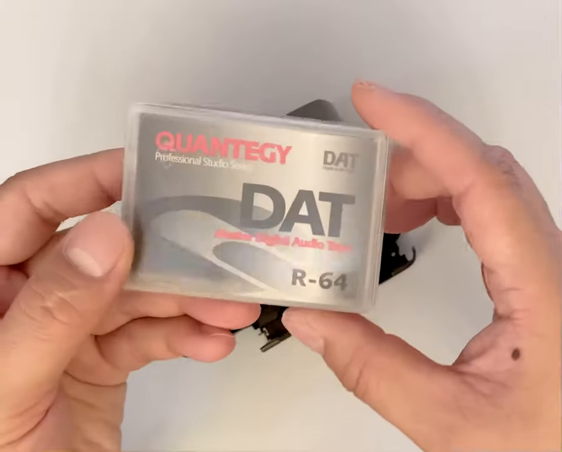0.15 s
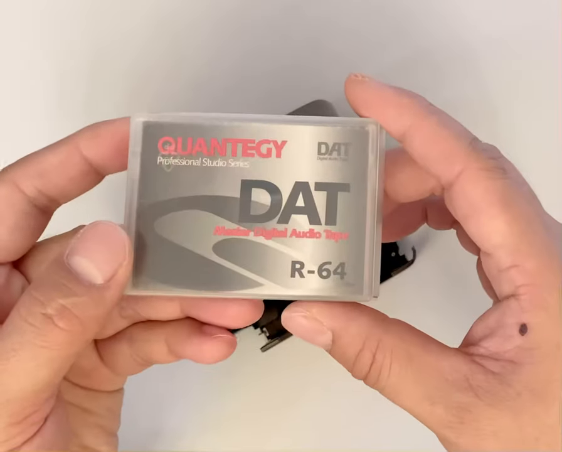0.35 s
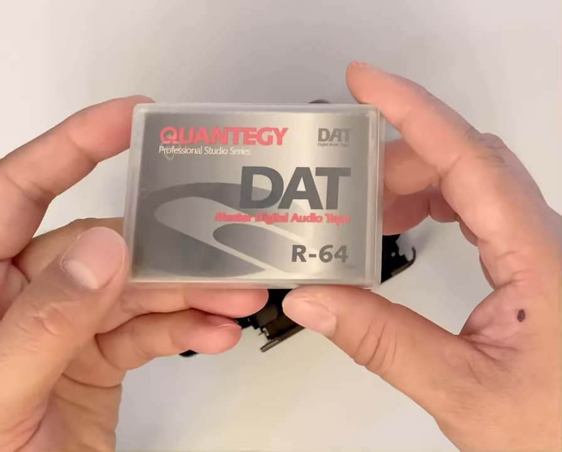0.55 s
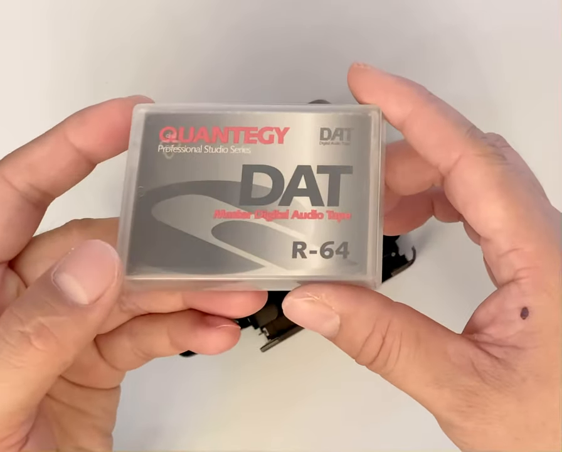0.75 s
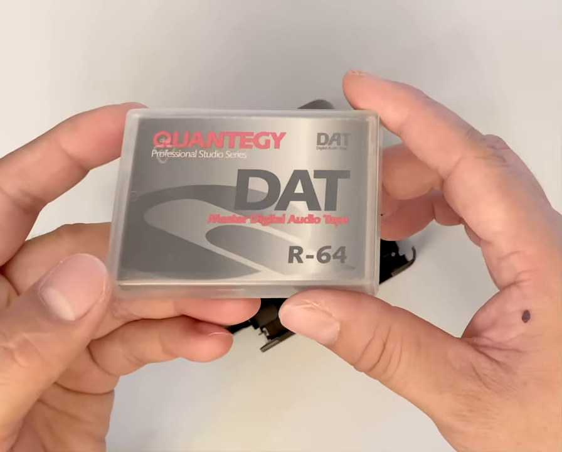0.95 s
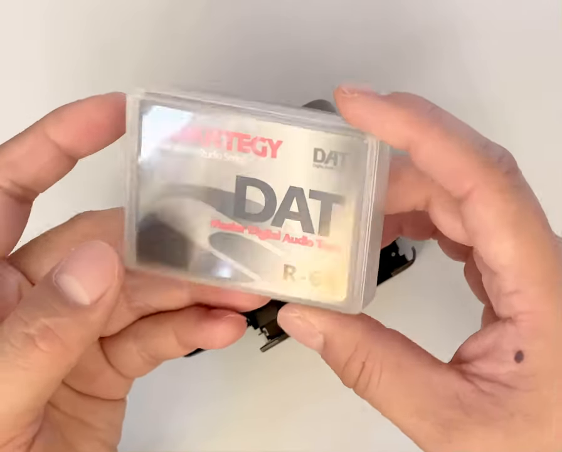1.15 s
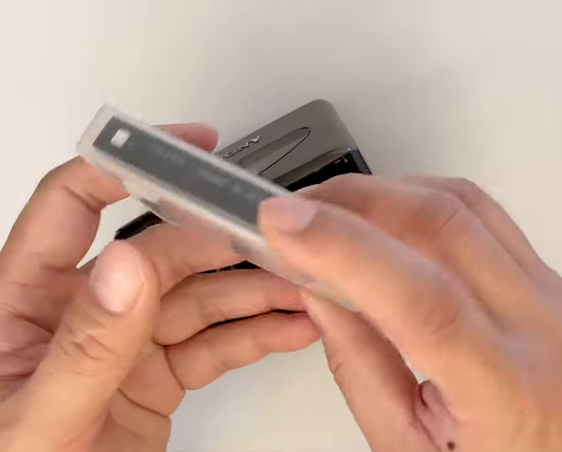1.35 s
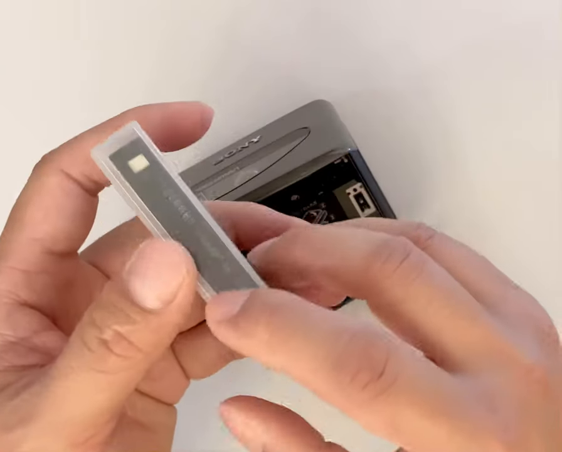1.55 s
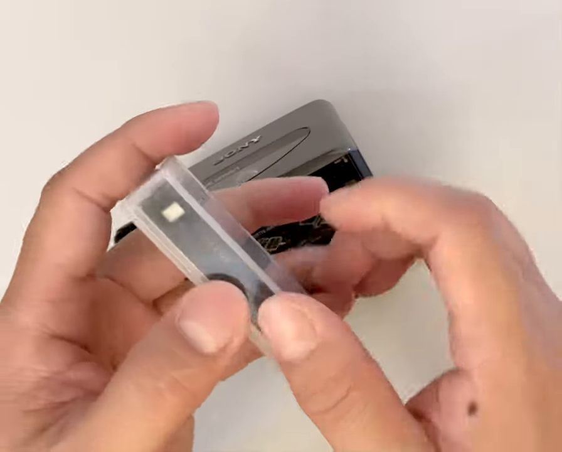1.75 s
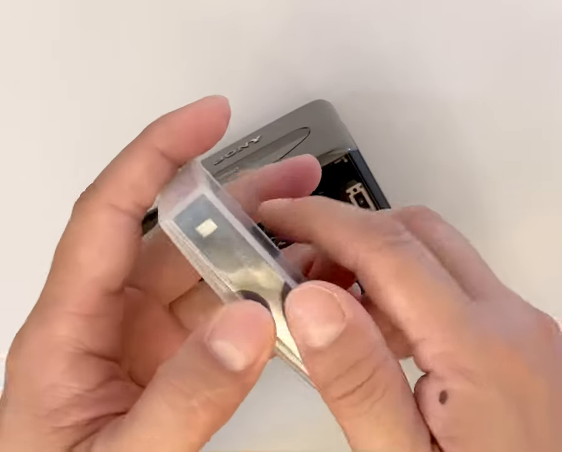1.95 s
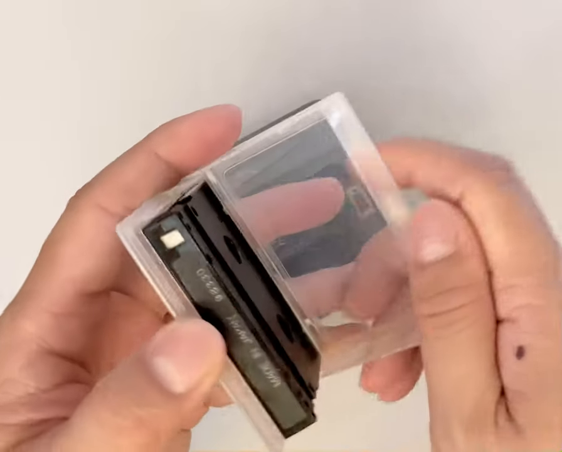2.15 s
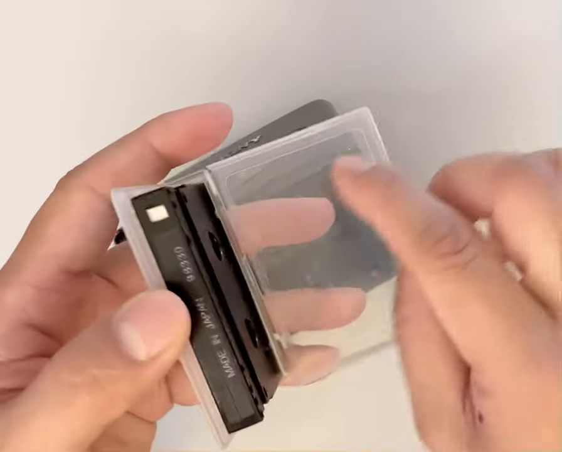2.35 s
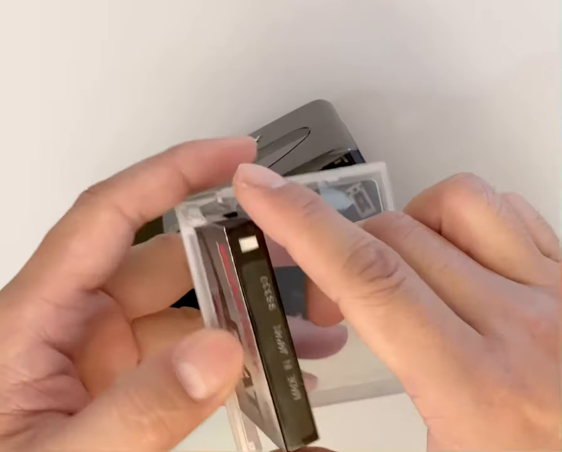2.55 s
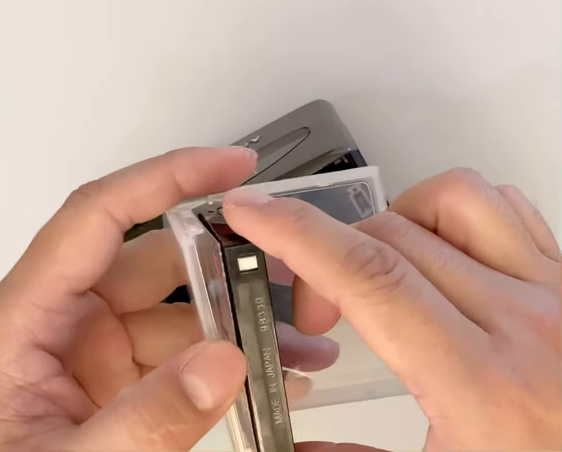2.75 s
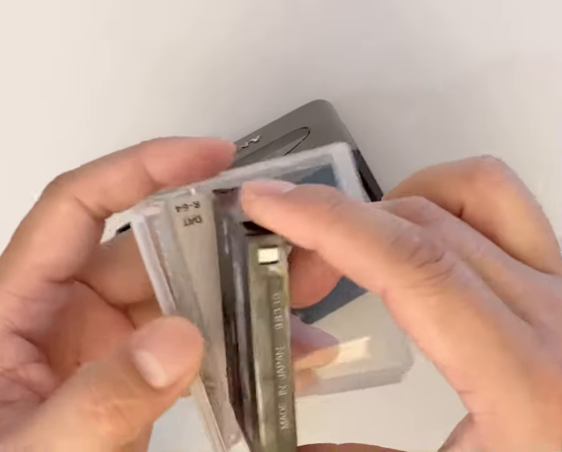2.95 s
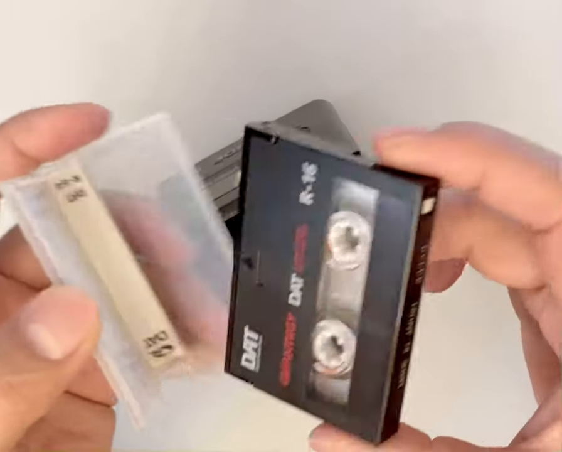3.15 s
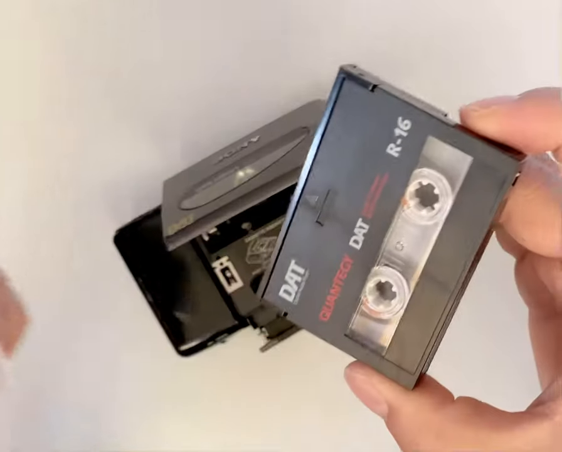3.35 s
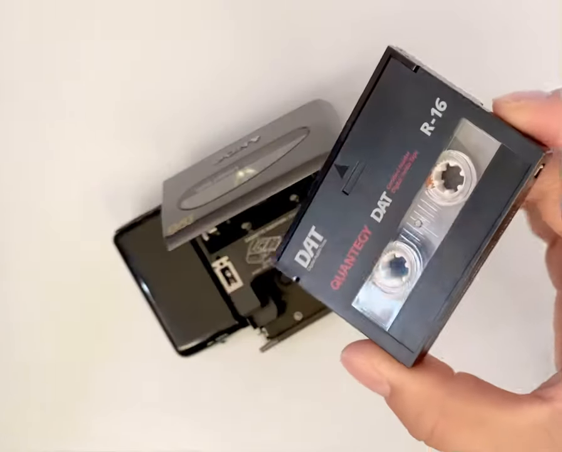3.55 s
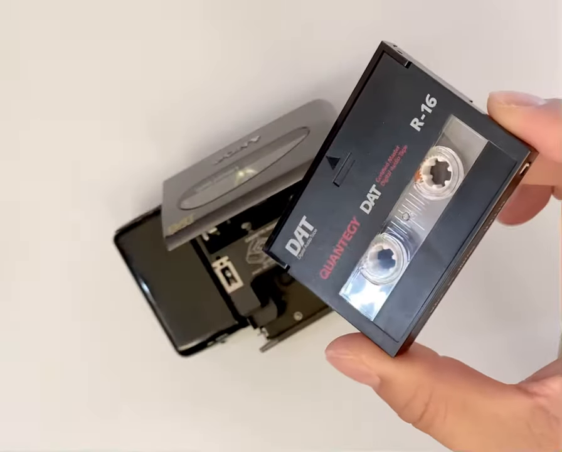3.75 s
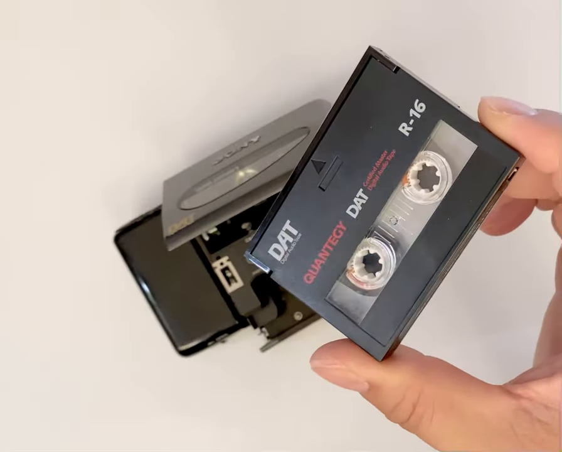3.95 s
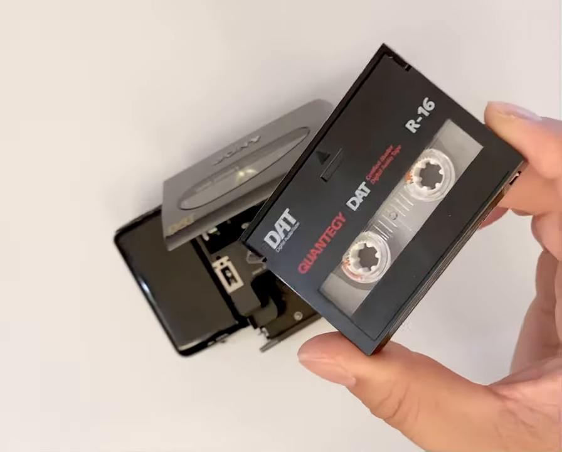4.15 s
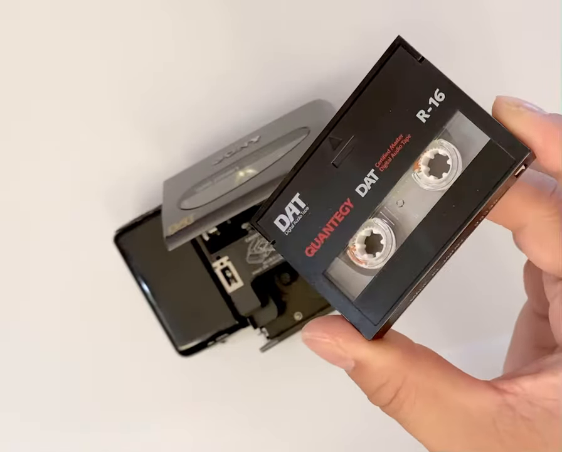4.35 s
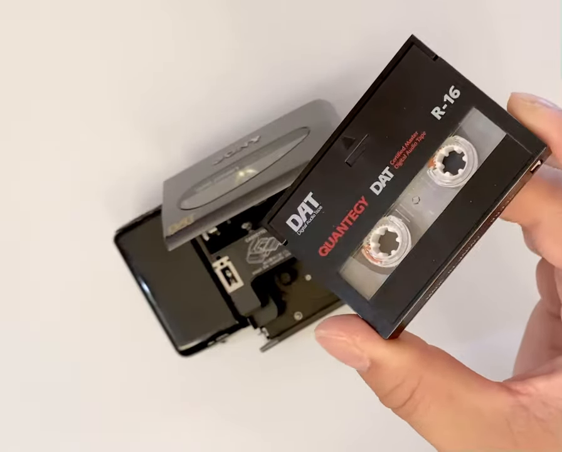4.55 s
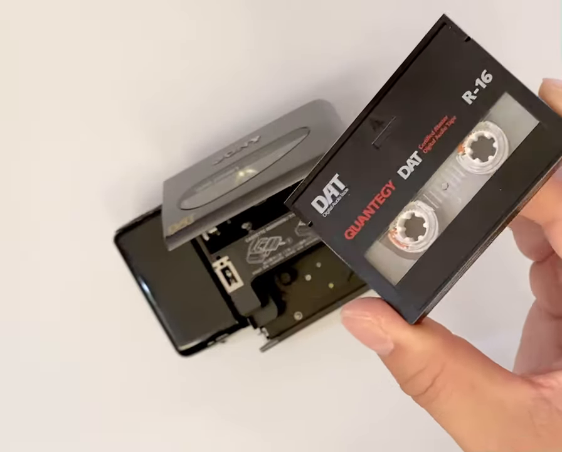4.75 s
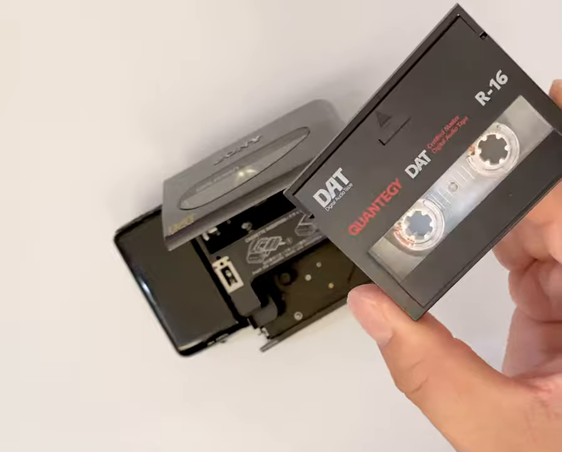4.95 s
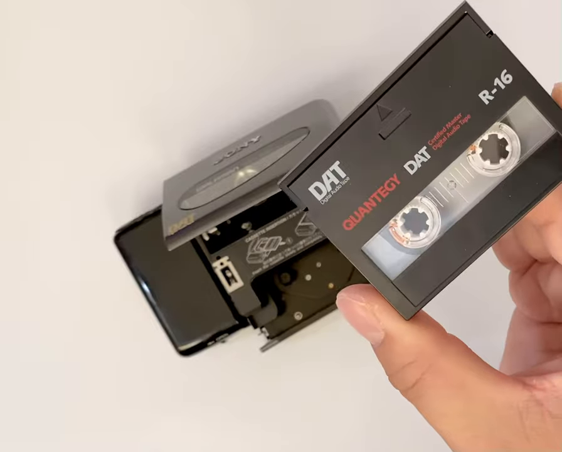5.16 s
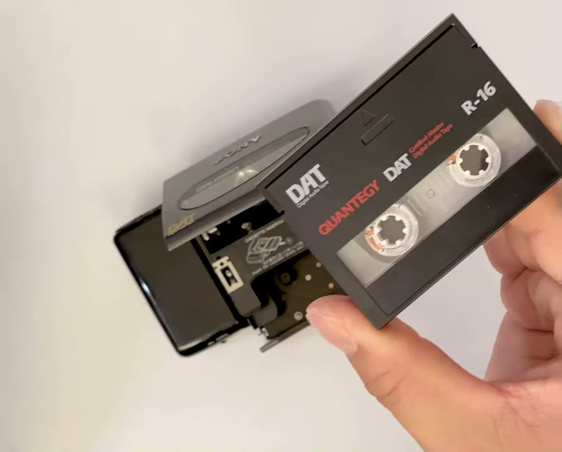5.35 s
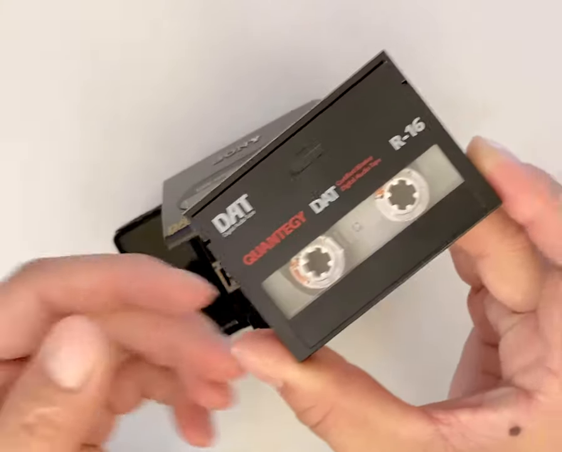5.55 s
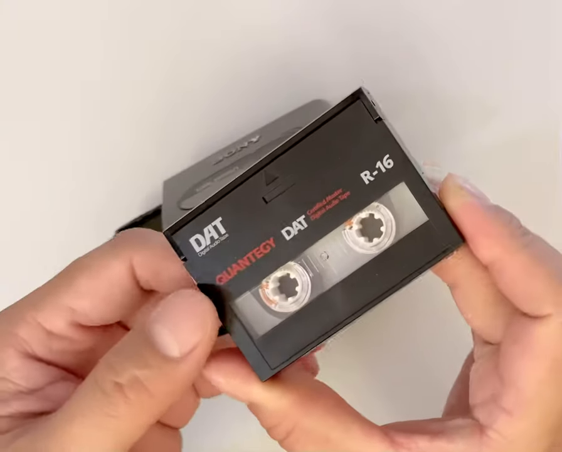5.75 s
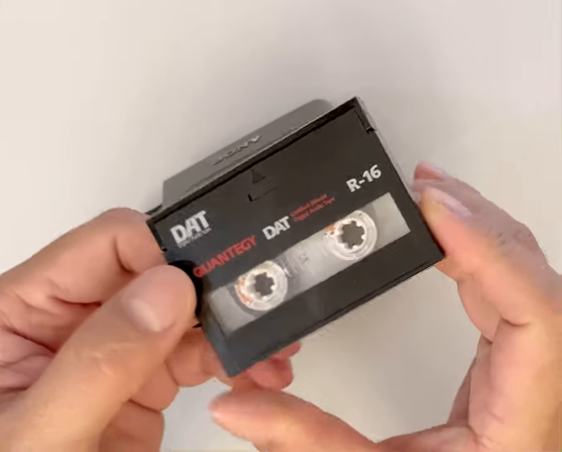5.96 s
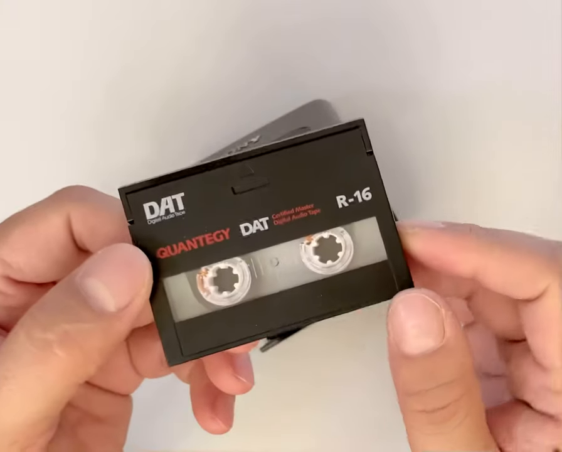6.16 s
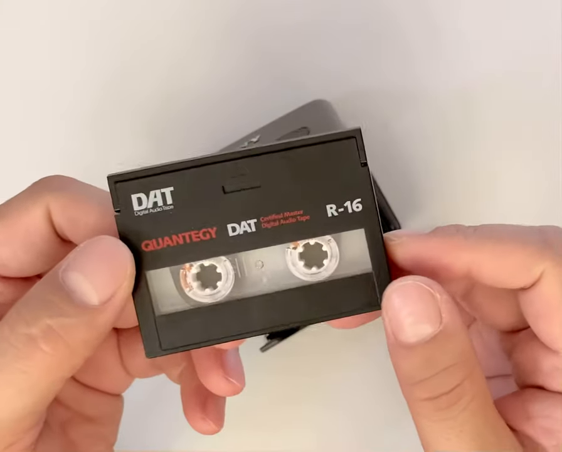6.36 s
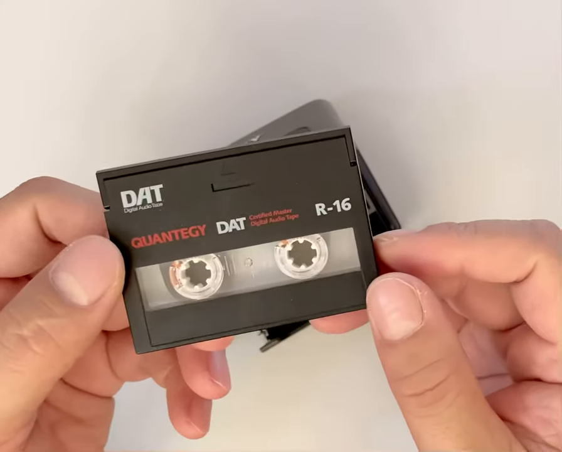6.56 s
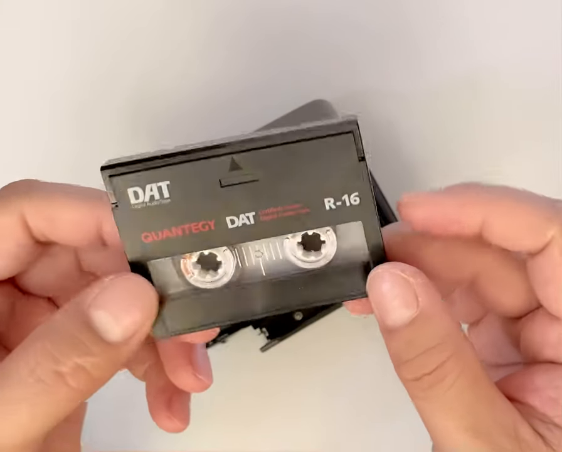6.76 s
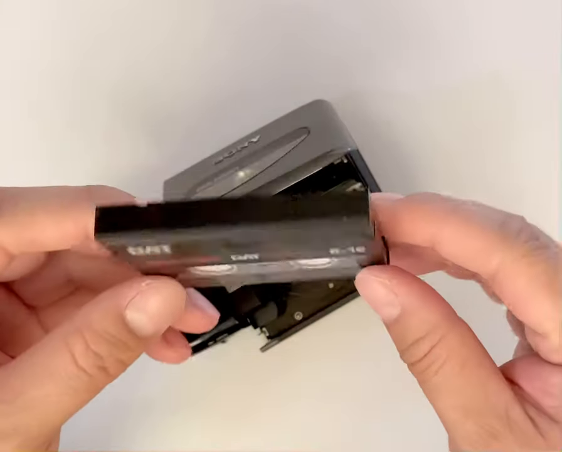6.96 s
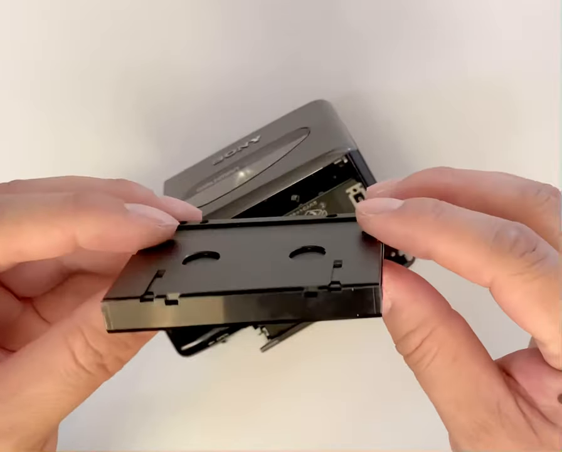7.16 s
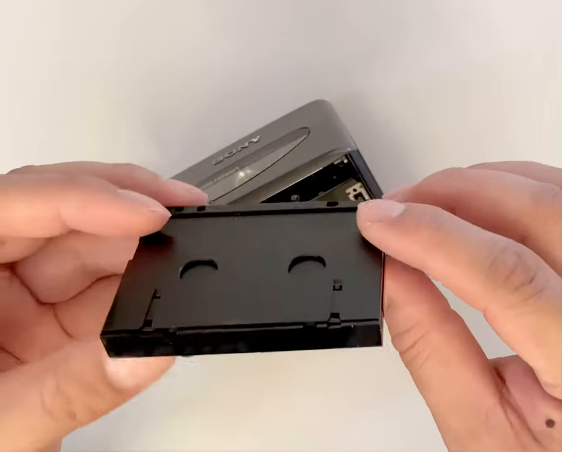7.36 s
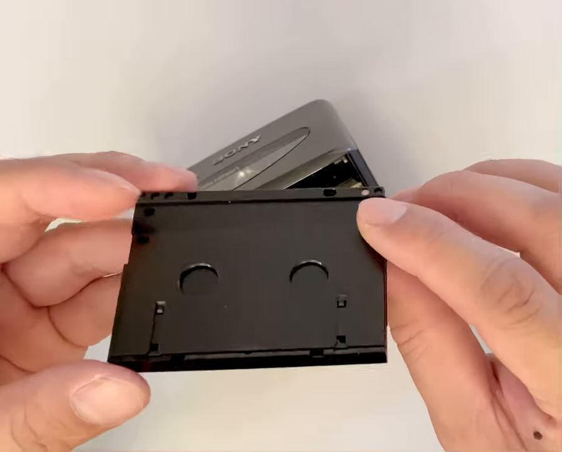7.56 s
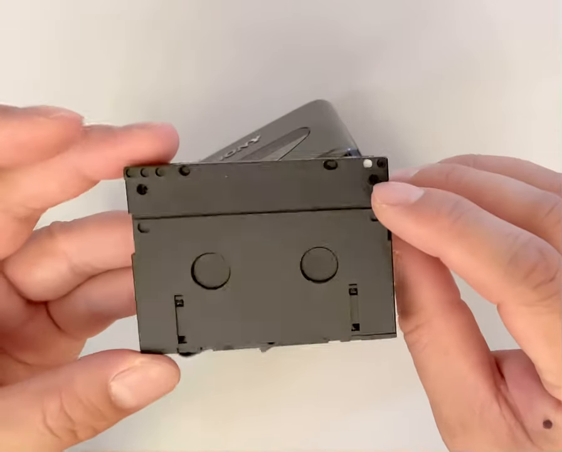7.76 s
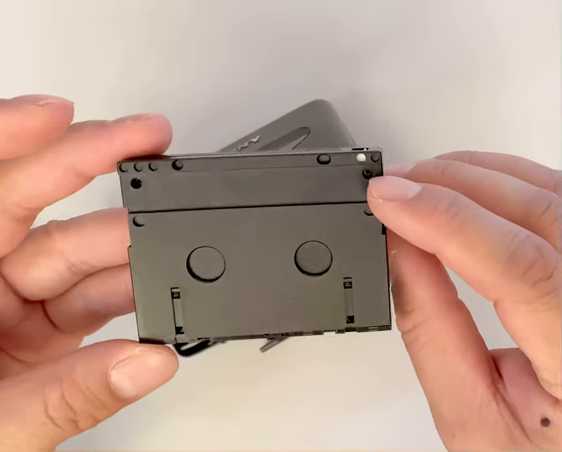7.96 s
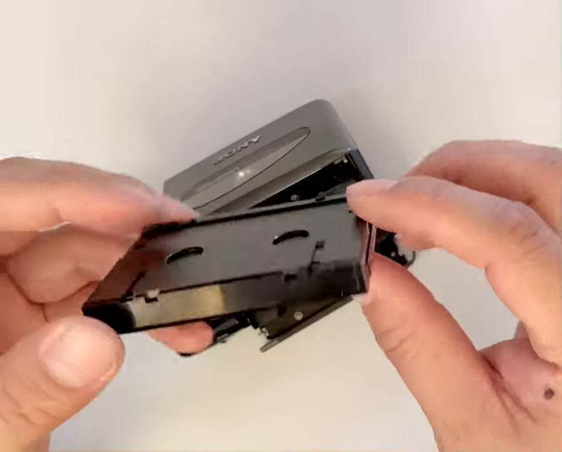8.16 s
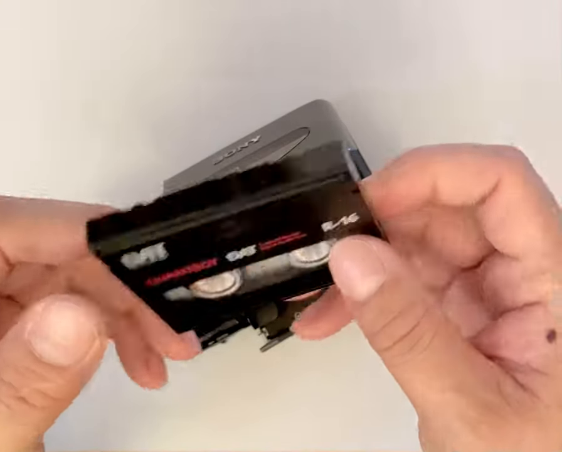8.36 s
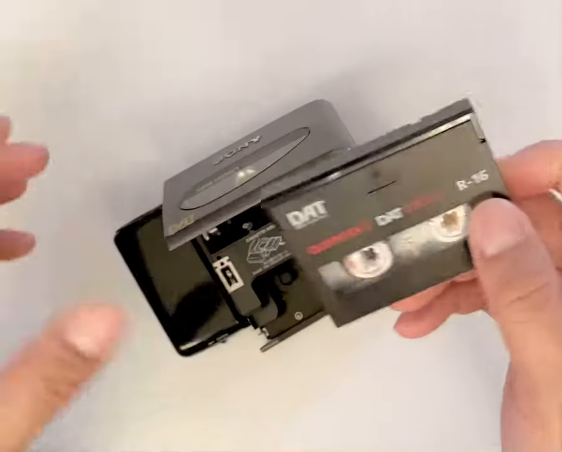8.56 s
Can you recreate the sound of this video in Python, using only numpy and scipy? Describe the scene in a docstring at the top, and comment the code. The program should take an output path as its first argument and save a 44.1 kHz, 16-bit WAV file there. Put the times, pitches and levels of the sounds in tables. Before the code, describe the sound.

A near phone-like stereo microphone picks up small plastic handling: soft rubbing, a sharp case click, a flurry of lid ticks and tape rattle, then a hard clack of the empty case on a table. It chatters flat and is pushed along with dry scrapes. Afterwards a cassette is turned quietly in the fingers, with tiny sparse ticks. Short room reflections and faint low room rumble surround it.

```python
"""Opening a cassette case

Hands turn a small plastic case, snap it open and slide the tape out, close to a phone in a small room.
The empty case clacks onto the table, falls flat and is pushed along; then fingers turn the tape over.
Clicks and rubs are bursts of noise that ring the plastic part; squeaks are noise in a sinking resonance.
Underneath lie noise shaped into a low rumble and a soft rustle, and a faint hum of wavering sine tones."""
import sys
import numpy as np
from scipy import signal
from scipy.fft import rfft, irfft, next_fast_len
from scipy.io import wavfile
from scipy.ndimage import uniform_filter1d

SR = 44100
rng = np.random.default_rng(int(sys.argv[2]) if len(sys.argv) > 2 else 0)


def inscribe(sig):
    """Save sig as 16-bit PCM at rate SR to the path in sys.argv[1].

    A 1-D sig is mono; a 2-D sig holds one channel per row.
    Samples are clipped to [-1, 1] before scaling.
    """
    pcm = np.round(np.clip(np.atleast_2d(sig).T, -1, 1) * 32767)
    wavfile.write(sys.argv[1], SR, pcm.astype(np.int16))


N = 379701

# Room rumble, its relative strength over pitch: pitch_hz, level_db
RUMBLE_SHAPE = [(20, -28), (30, -27), (42, -4.5), (51, 3.5), (63, -3.5), (88, -8.5), (113, -4), (160, -6),
                (220, -18), (290, -23.5), (700, -27), (2000, -37), (4000, -45), (10000, -58.5),
                (15000, -89.5)]
# Where the rumble sits: pitch_hz, left_minus_right_db
RUMBLE_SIDE = [(60, -1.5), (110, -1.5), (200, -3), (380, -8.5), (700, -1), (1290, 5), (2380, -2.5)]
RUMBLE_DB = -53  # before its bass is eased
BASS_START_DB, BASS_END_DB, BASS_SETTLES_S = 2.5, -1, 7.7  # the bass of the rumble eases off
# Hum tones: pitch_hz, level_db
HUM_TONES = [(114, -64.5), (199, -65.5), (243, -71.5), (305, -66.5), (732, -79)]
# Soft rustle of moving hands: peak_s, length_s, level_db
RUSTLES = [(.6, 2.2, -67), (2.2, 4.2, -67), (5.39, 0.055, -59.5)]
# How alike left and right are: pitch_hz, likeness (0 to 1)
LEFT_RIGHT_LIKENESS = [(30, 1), (120, 1), (300, 0.44), (700, 0.029), (2000, 0.24), (5000, 0.16),
                       (15000, 0.2)]

# Plastic slipping on a finger, the tape or the table; a wide resonance scrapes, a narrow one squeaks:
# peak_s, length_s, level_db, pitch_hz, half_width_hz
SQUEAKS = [(0.13, 0.1, -76, 6100, 500), (0.806, 0.04, -64, 2320, 450), (2.266, 0.025, -49, 2100, 454),
           (2.718, .03, -49, 2700, 350), (3.1, 0.053, -58, 3770, 250), (3.238, .014, -45, 1390, 160),
           (3.253, 0.031, -36.5, 1355, 160), (3.318, 0.031, -43.5, 1430, 160), (3.745, .03, -46, 3400, 300),
           (3.801, 0.0095, -43.5, 3200, 600), (4.004, .08, -55, 2980, 400), (4.933, 0.02, -42.5, 1350, 303),
           (5.238, 0.014, -54.5, 2790, 247), (7.261, 0.06, -59.5, 5500, 600)]
SQUEAK_SAG_HZ_PER_S = 1700

# Strokes of the rubbing sounds: peak_s, length_s, rasp_db, hiss_db
FINGERS_ON_CASE = [(1.035, 0.05, -69, -76), (1.108, 0.024, -64.5, -56.5), (1.415, 0.11, -69, -62.5),
                   (1.592, 0.027, -55.5, -46.5), (1.708, 0.056, -66.5, -60), (2.07, 0.24, -65.5, -59.5),
                   (2.145, 0.22, -64.5, -79), (2.466, 0.076, -57.5, -51), (2.652, 0.07, -56, -64),
                   (2.73, 0.072, -56, -58), (2.815, 0.061, -60.5, -63.5), (2.96, 0.063, -62.5, -63),
                   (3.08, 0.16, -66, -74), (3.155, 0.12, -63, -53), (3.245, 0.041, -58.5, -63)]
CASE_SLIDING = [(3.385, 0.19, -57.5, -59.5), (3.69, 0.038, -46.5, -69), (3.75, 0.13, -61, -56),
                (3.865, 0.057, -53, -64), (3.975, 0.03, -58, -56.5), (4.015, 0.085, -53.5, -60),
                (4.35, 0.085, -64, -71.5), (4.52, 0.044, -61, -59.5), (4.63, 0.14, -58.5, -67),
                (4.74, 0.089, -58.5, -65), (4.795, 0.049, -51.5, -57), (4.849, 0.073, -42, -45.5),
                (4.92, 0.1185, -52.5, -53), (5.11, 0.056, -64, -66), (5.25, 0.086, -67.5, -76),
                (5.375, 0.1, -73, -65)]
FINGERS_ON_TAPE = [(5.655, .04, -66, -66), (5.845, 0.016, -86, -57.5), (6.525, 0.089, -68.5, -81),
                   (6.8, 0.38, -76, -86), (7.245, 0.078, -53.5, -63.5), (7.295, 0.083, -56, -60),
                   (7.365, 0.02, -68, -66.5), (7.575, .12, -71, -75), (7.985, 0.062, -68, -71.5),
                   (8.15, 0.03, -65, -61), (8.215, 0.064, -66, -72), (8.275, 0.057, -66.5, -63)]
# Every stroke: level at both ends, share of its length before the peak, roundness of the peak
STROKE_EDGE_DB, STROKE_RISE_SHARE, STROKE_CURVE = -9.5, 0.53, 1.1

# Contacts of each thing that clicks: start_s, thud_db, ring_db, tick_db
FINGER_KNOCKS = [(1.311, -55, -55.5, -69.5), (1.364, -55, -80, -68), (1.409, -81, -52.5, -65),
                 (1.434, -70, -60.5, -70)]
CASE_CLICKS = [(1.5903, -57.5, -45, -53), (1.8656, -73, -49.5, -43.5), (1.8876, -59, -27.5, -30),
               (1.8928, -37.5, -35.5, -37), (1.9245, -51, -58, -47), (3.1515, -46.5, -41.5, -49)]
LID_CLICKS = [(2.1794, -77, -62, -55.5), (2.259, -44.5, -39, -50), (2.2622, -47.5, -40.5, -44),
              (2.2665, -43.5, -42, -44), (2.2945, -38.5, -40, -46.5), (2.301, -54, -57, -47),
              (2.3485, -46, -44, -41.5)]
TAPE_IN_CASE = [(2.4332, -72, -69, -58), (2.4631, -60, -59, -52), (2.4781, -68, -51, -49),
                (2.5152, -71, -58.5, -61), (2.571, -52.5, -54, -63), (2.6008, -80, -58, -64),
                (2.6194, -82, -51, -51.5), (2.625, -82, -48, -56), (2.638, -80, -56, -51.5),
                (2.6926, -80, -61, -57), (2.7096, -80, -55, -56), (2.716, -72, -54, -51.5),
                (2.789, -67, -72, -56), (2.8587, -54, -55.5, -57.5), (2.8945, -81, -55, -59),
                (2.9005, -81, -49, -69)]
CASE_DROP = [(3.3105, -70.5, -52.5, -48), (3.3207, -57, -52, -33), (3.3221, -35.5, -20.5, -15),
             (3.3242, -28.5, -19.5, -25)]  # a light tick as it leaves the finger, then it lands, one edge after the other
TABLE_KNOCKS = [(3.6575, -57.5, -43, -29), (3.6595, -40, -66, -59), (3.698, -52, -50, -62),
                (4.1784, -62, -53.5, -61.5), (4.523, -49.5, -50, -72), (4.5375, -52, -50.5, -54),
                (4.556, -57, -59, -52), (4.585, -57, -60, -82), (5.0474, -61, -54, -71)]
CASE_SETTLES = [(3.8283, -62, -48, -33), (3.8302, -49, -39, -48), (3.8329, -45.5, -40, -48),
                (3.868, -49, -65, -56)]  # it falls flat and chatters to rest
TAPE_CLICKS = [(5.6168, -76.5, -56.5, -48.5), (5.6203, -69, -46.5, -63), (6.0317, -90, -48, -53.5),
               (6.041, -85, -52, -68), (7.3133, -79, -54, -59), (7.322, -82, -57.5, -55),
               (7.4335, -85, -49, -60.5), (7.4415, -84, -55.5, -63), (7.4918, -83, -63, -71.5),
               (7.5487, -86, -66.5, -69), (7.5762, -81, -59.5, -62), (7.632, -85, -64.5, -81),
               (7.981, -76, -59.5, -66.5), (8.0067, -68, -61, -63), (8.1035, -74, -58.5, -57),
               (8.2, -71, -51, -57), (8.209, -80, -52, -60), (8.215, -72, -49, -62),
               (8.3313, -83, -55.5, -49.5)]
# A harder blow makes a shorter contact: level with the stated contact time, and how fast it shrinks
CONTACT_AT_DB, CONTACT_SLOPE = -58, 0.17

# What each thing rings with; t60 is the time to fade by 60 dB: pitch_hz, energy_db, t60_s
SHUT_CASE_MODES = [(835, 3.5, 0.041), (1020, 2, 0.03), (1400, 5, 0.015)]
CASE_MODES = [(211.1, -9.5, 0.14), (336, -3.5, 0.023), (860, -2, 0.025), (1085, -3, 0.035),
              (1323.5, 1, 0.036), (1558, -1.5, 0.012), (2350, -10, .008), (2970, -18, 0.015),
              (4490, -15, 0.035), (5750, -9, 0.0089), (6200, -7.5, 0.011), (6945, -8.5, 0.0086)]
LID_MODES = [(476, -4.5, 0.016), (815, -5, 0.011), (1430, -5.5, 0.02), (1950, -0.5, 0.034),
             (2300, 3.5, 0.015), (3715, -6, .012), (5030, -6, .015), (6500, -0.5, 0.01), (7100, 1.5, 0.027),
             (10000, -8.5, .008)]
LANDING_MODES = [(470, -8.5, 0.0068), (912, -10.5, 0.055), (1050, 5, 0.0067), (1017, -13, 0.12),
                 (1400, 3.5, 0.0054), (1809, -5.5, 0.013), (2380, -9, 0.0073), (2900, -15.5, .05),
                 (3450, -7.5, .006), (4180, 2, .0045), (4280, -15, .06), (5100, -9.5, 0.0034),
                 (5850, -7.5, .008), (6960, 1, 0.0073)]  # case and table struck together
PRESSED_CASE_MODES = [(941, -4, 0.035), (1150, -10.5, 0.011), (1600, 0.5, 0.025), (2600, 4, 0.015),
                      (3140, 5, 0.009), (4100, 2.5, 0.008), (5150, -8, 0.006), (6300, -7.5, 0.0042)]  # the case pressed to the table
CASE_ON_TABLE_MODES = [(294, -9, 0.045), (504, -4, 0.065), (905, -3, 0.077), (1150, 0, 0.016),
                       (1420, 4, 0.031), (1820, 1, 0.024), (2570, 3, 0.026), (3430, 9.5, 0.022),
                       (4584, 2.5, 0.01), (5750, 9, 0.008), (7070, 15, 0.009), (8480, 9, .01)]
FLAT_CASE_MODES = [(508, 0, 0.045), (764, 1.5, 0.12), (967, 7, 0.041), (1600, -5, .02), (2060, -7, 0.13),
                   (2800, -10, 0.056), (3230, -3, 0.077), (3990, -1, 0.035), (5040, -25, .03),
                   (7180, 3, .006)]  # lying flat, it sounds hollow
TAPE_MODES = [(1510, -4, 0.045), (1703, 1.5, 0.026), (2165, 8, 0.016), (2486, -4, 0.039), (3420, 0, 0.02),
              (4170, 0, 0.0096), (5440, -3, 0.014), (6230, -0.5, 0.011), (7630, 2.5, 0.0062)]

# Fading tail of the room: pitch_hz, t60_s, level_db
ROOM_TAIL = [(150, 0.15, -17.5), (399.2, 0.21, -9.5), (995, 0.17, -9.5), (2300, 0.28, -8.5),
             (3800, 0.2, -4), (7000, 0.18, -16), (10123, 0.12, -13), (12030, 0.052, -20.5)]
# Nearby surfaces scatter sound back in one soft cluster: delay, spread, lift over the tail
EARLY_S, EARLY_WIDTH_S, EARLY_DB = .011, 0.0034, 6.5
BODY_BLUR_HZ, TREBLE_BLUR_HZ = 140, 480  # typical pitch wander of the tail
EDGE_HZ = 15800  # top of the audible band


def gain_of(db):
    """Turns decibels into a multiplier."""
    return 10 ** (np.asarray(db) / 20)


def evened(x):
    """Scales a sound to an average (rms) level of 1."""
    return x / np.sqrt(np.mean(x ** 2) + 1e-30)


def unit(x):
    """Scales a sound to a total energy of 1."""
    return x / np.sqrt(np.sum(x ** 2) + 1e-30)


def read(points, hz):
    """Reads the columns of a table at given pitches, evenly along a log scale."""
    f, *columns = np.transpose(points)
    return [np.interp(np.log(hz + 1), np.log(f + 1), c) for c in columns]


def band(x, lo_hz, hi_hz, order=3):
    """Keeps the part of a sound between two pitches."""
    return signal.sosfilt(signal.butter(order, [lo_hz, hi_hz], "band", fs=SR, output="sos"), x)


def lows(x, edge_hz):
    """Keeps the part of a sound below an edge, without delay."""
    return signal.sosfiltfilt(signal.butter(3, edge_hz, fs=SR, output="sos"), x)


def add(mix, s, sound):
    """Mixes a sound in at time s; a negative time counts back from the end of the mix."""
    part = mix[round(s * SR):][:len(sound)]
    part += sound[:len(part)]


def left_right(a, b, hz):
    """Turns two unrelated spectra into a left-right pair, alike in the bass."""
    same = read(LEFT_RIGHT_LIKENESS, hz)[0]
    return np.array([a, same * a + np.sqrt(1 - same ** 2) * b])


def swell(t, peak_s, length_s):
    """Gain of one stroke at times t: it gathers speed, peaks and comes to rest."""
    u = (t - peak_s) / length_s
    away = np.maximum(-u / STROKE_RISE_SHARE, u / (1 - STROKE_RISE_SHARE))
    return gain_of(STROKE_EDGE_DB * np.minimum(away, 10) ** STROKE_CURVE)


def effort(strokes):
    """Joint gain of overlapping strokes, given as peak_s, length_s, level_db; their powers add up."""
    t = np.arange(N) / SR
    coarse = t[::40]
    power = sum((gain_of(db) * swell(coarse, s, length)) ** 2 for s, length, db in strokes)
    return np.interp(t, coarse, np.sqrt(power + 1e-20))


def ring(modes, vary_db, detune):
    """Free ringing of a plastic part as fading sines; grip and point of contact vary its modes."""
    hz, db, t60 = np.transpose(modes)[:, :, None]
    size, shift = rng.standard_normal((len(modes), 2)).T[:, :, None]
    t = np.arange(4096) / SR
    sign = (-1) ** np.arange(len(modes))[:, None]  # neighbouring modes swing in opposite senses
    waves = sign * np.sin(2 * np.pi * hz * (1 + detune * shift) * t)
    strength = gain_of(db + vary_db * size) / np.sqrt(t60)
    fade = np.exp(-np.log(1000) * t / t60)
    return unit((strength * fade * waves).sum(0))


def rub(rows, modes, slips_per_s, spread_db, direct_db, low_hz, split_hz, top_hz,
        grip_rasp_db, grip_hiss_db, bite_db, bite_slope, wander, clump_db=3):
    """Countless tiny uneven slips ring the part; a stroke's pressure feeds the rasp, its speed the hiss."""
    strokes, t = np.array(rows), np.arange(N) / SR
    first_s, last_s = rows[0][0], rows[-1][0]
    # between the strokes the part still creeps faintly in the grip
    held = uniform_filter1d(1. * ((t > first_s) & (t < last_s)), size=8000)
    pressure = np.hypot(effort(strokes[:, [0, 1, 2]]), gain_of(grip_rasp_db) * held)
    speed = np.hypot(effort(strokes[:, [0, 1, 3]]), gain_of(grip_hiss_db) * held)
    touching = (t > first_s - .3) & (t < last_s + .3)

    sizes = gain_of(spread_db * np.minimum(rng.exponential(1, N), 4))
    clumps = evened(uniform_filter1d(rng.standard_normal(N), size=260))
    sizes *= gain_of(clump_db * clumps)  # the slips come in clumps
    slipping = (rng.random(N) < slips_per_s / SR) * touching
    slips, grit = rng.standard_normal((2, N)) * sizes * slipping
    sound = gain_of(direct_db) * grit + 1e-9

    # the grip keeps shifting, so the resonances wander from one moment to the next
    hop = SR // 40
    for start in np.flatnonzero(touching[:N - 2 * hop:hop]) * hop:
        moment = slips[start:start + 2 * hop] * signal.windows.cosine(2 * hop)
        add(sound, start / SR, signal.fftconvolve(moment, ring(modes, vary_db=4, detune=wander)))

    sound = band(sound, low_hz, 18000)
    body = lows(sound, split_hz)
    edge = band(sound - body, 1000, 4800, order=2)
    hiss = band(sound, 5400, top_hz, order=5)
    body, edge, hiss = (x / x[touching].std() for x in (body, edge, hiss))
    # harder pressure makes the edge bite, which brightens the rasp
    bite = gain_of(bite_db) * np.maximum(pressure / pressure.max(), .1) ** bite_slope
    return pressure * (body + bite * edge) + speed * hiss


def clicks(rows, modes, detune, crack_db, chatter_db, chatter_s, lead_in_db, contact_ms, top_hz=9700):
    """Each contact is a brief noise swelling up to the blow, a rough crack, the part's ringing and chatter."""
    out = np.zeros(N)
    for s, thud_db, ring_db, tick_db in rows:
        loudest_db = max(thud_db, ring_db, tick_db)
        touch_ms = contact_ms * gain_of(CONTACT_SLOPE * (CONTACT_AT_DB - loudest_db))
        body = ring(modes, vary_db=0, detune=detune)
        t = np.arange(len(body)) / SR
        u = t * 1000 / max(touch_ms, .2)  # time counted in contact times
        grit, loose, lead_in_noise = rng.standard_normal((3, len(t)))
        crack = unit(band(grit, 1000, 21050, order=1) * u * np.exp(-1.5 * u))
        chatter = unit(loose * np.exp(-t / chatter_s))
        ringing = (body + gain_of(chatter_db) * chatter) * (1 - np.exp(-2 * u))
        blow = ringing + gain_of(crack_db) * crack
        # a fading noise played backwards swells up to the blow
        lead_in = gain_of(lead_in_db) * unit(lead_in_noise * np.exp(-u / 2))[:SR // 50][::-1]
        blow = band(np.concatenate([lead_in, blow]), 170, top_hz)
        # a soft, heavy contact feeds the thud; a hard, light one feeds the tick
        thud, below_tick = lows(blow, 690), lows(blow, 2800)
        parts = [(thud_db, thud), (ring_db, below_tick - thud), (tick_db, blow - below_tick)]
        click = sum(gain_of(db) * unit(p) for db, p in parts)
        add(out, s - len(lead_in) / SR, np.sqrt(SR / 100) * click)  # levels count as rms over 10 ms
    return out


def background(waver=.25, left_lead_rad=.04):
    """Slowly easing room rumble, a wavering hum and the soft rustle of the hands."""
    size = next_fast_len(N, real=True)
    hz, t, hum = np.fft.rfftfreq(size, 1 / SR), np.arange(N) / SR, np.zeros(N)
    a, b = rfft(rng.standard_normal((2, size))) * gain_of(read(RUMBLE_SHAPE, hz)[0])
    pair = left_right(a, b, hz) * gain_of(np.array([[.5], [-.5]]) * read(RUMBLE_SIDE, hz)[0])
    pair[0] *= np.exp(1j * left_lead_rad)
    whole, bass = irfft(pair, size)[:, :N], irfft(pair * (hz < 260), size)[:, :N]
    easing = gain_of(np.interp(t, [0, BASS_SETTLES_S], [BASS_START_DB, BASS_END_DB]))
    rumble = gain_of(RUMBLE_DB) * (whole + (easing - 1) * bass) / whole.std()
    for tone_hz, db in HUM_TONES:
        wobbles = rng.standard_normal((2, 110))
        drift, swell_by = (np.interp(t, np.linspace(0, t[-1], len(v)), v) for v in wobbles)
        tone = np.sin(2 * np.pi * tone_hz * t + 5 * waver * drift)
        hum += gain_of(db) * np.sqrt(2) * (1 + waver * swell_by) * tone
    rustle = effort(RUSTLES) * evened(band(rng.standard_normal(N), 220, 950, order=2))
    return rumble + hum * gain_of([[-1.3], [1.3]]) + rustle


def squeaks(octave_db=-20):
    """Each slip is stick-slip noise in one broad, sinking resonance, with a weak octave."""
    out = np.zeros(N)
    t = np.arange(-SR // 4, SR // 4) / SR
    for s, length, db, hz, half_width_hz in SQUEAKS:
        narrow = signal.butter(3, half_width_hz, fs=SR, output="sos")
        jitter = signal.sosfilt(narrow, rng.standard_normal((4, len(t))))
        sinking_hz = hz - SQUEAK_SAG_HZ_PER_S * np.clip(t, -length, length)
        angle = 2 * np.pi * np.cumsum(sinking_hz) / SR
        main = jitter[0] * np.sin(angle) + jitter[1] * np.cos(angle)
        octave = jitter[2] * np.sin(2 * angle) + jitter[3] * np.cos(2 * angle)
        slip = gain_of(db) * swell(t, 0, length) * evened(main + gain_of(octave_db) * octave)
        # a peak before 0.25 s starts at a negative time: only its faint lead-in lands, at the very end
        add(out, s + t[0], slip)
    return out


def fingers_on_case():
    """Fingers rub the case, and the slips ring its thin lid."""
    return rub(FINGERS_ON_CASE, LID_MODES, slips_per_s=3800, spread_db=2.0, direct_db=0.5,
               low_hz=1190, split_hz=2200, top_hz=11115, grip_rasp_db=-84.0, grip_hiss_db=-91.0,
               bite_db=0.0, bite_slope=0.59, wander=0.11)


def finger_knocks():
    """Fingers knock softly on the shut case, which rings low and short."""
    return clicks(FINGER_KNOCKS, SHUT_CASE_MODES, detune=0.027, crack_db=-19, chatter_db=-8,
                  chatter_s=0.0034, lead_in_db=-12, contact_ms=2.0)


def case_clicks():
    """Short contacts ring the whole case in the hands."""
    return clicks(CASE_CLICKS, CASE_MODES, detune=0.008, crack_db=-12, chatter_db=-8,
                  chatter_s=0.006, lead_in_db=-18.5, contact_ms=0.59)


def lid_clicks():
    """The thin lid ticks crisply: its contacts and chatter are short."""
    return clicks(LID_CLICKS, LID_MODES, detune=0.048, crack_db=-4.0, chatter_db=-3.0,
                  chatter_s=.0025, lead_in_db=-8, contact_ms=0.35)


def tape_in_case():
    """The tape clicks in the case as it slides out, ringing the lid with a rough crack."""
    return clicks(TAPE_IN_CASE, LID_MODES, detune=0.073, crack_db=2, chatter_db=1,
                  chatter_s=0.0045, lead_in_db=-2, contact_ms=1.0, top_hz=8550)


def case_drop():
    """The empty case leaves the finger with a tick and lands edge after edge, ringing with the table."""
    return clicks(CASE_DROP, LANDING_MODES, detune=0.004, crack_db=-4.5, chatter_db=-14,
                  chatter_s=.002, lead_in_db=-22, contact_ms=1.5)


def case_sliding():
    """The case is pushed along the table, and the slips ring it while pressed down."""
    return rub(CASE_SLIDING, PRESSED_CASE_MODES, slips_per_s=5000, spread_db=1.0, direct_db=-4.5,
               low_hz=780, split_hz=1800, top_hz=10560, grip_rasp_db=-79.0, grip_hiss_db=-88.0,
               bite_db=3.5, bite_slope=0.44, wander=0.035)


def table_knocks():
    """The case knocks on the table in longer contacts that ring it there."""
    return clicks(TABLE_KNOCKS, CASE_ON_TABLE_MODES, detune=0.015, crack_db=-12, chatter_db=-2.5,
                  chatter_s=0.011, lead_in_db=-34.0, contact_ms=2.3)


def case_settles():
    """The case falls flat, rings hollow and chatters to rest."""
    return clicks(CASE_SETTLES, FLAT_CASE_MODES, detune=0.0042, crack_db=0.5, chatter_db=-2,
                  chatter_s=0.018, lead_in_db=-19, contact_ms=2.5)


def tape_clicks():
    """The tape clicks in the fingers, ringing its own small plastic body."""
    return clicks(TAPE_CLICKS, TAPE_MODES, detune=0.061, crack_db=-2, chatter_db=-5.5,
                  chatter_s=0.0091, lead_in_db=-9.0, contact_ms=0.78)


def fingers_on_tape():
    """Fingers turn the tape, and dense, fine slips ring it."""
    return rub(FINGERS_ON_TAPE, TAPE_MODES, slips_per_s=7700, spread_db=1.0, direct_db=-1,
               low_hz=1640, split_hz=2020, top_hz=11250, grip_rasp_db=-83.0, grip_hiss_db=-99,
               bite_db=-5.5, bite_slope=0.39, wander=0.048, clump_db=2)


def room(x, lead_s=3.6e-5, scatter_db=-14):
    """Direct sound reaches the left side first; scattered early echoes and a short diffuse tail follow."""
    hz, t, (a, b) = signal.stft(rng.standard_normal((2, SR // 2)), SR, nperseg=256)
    t60, db = read(ROOM_TAIL, hz[:, None])
    fade = gain_of(db) * np.exp(-np.log(1000) * t / t60) * np.sqrt(2 * np.log(1000) / (t60 * SR))
    tail = signal.istft(left_right(a, b, hz[:, None]) * fade, SR, nperseg=256)[1]
    t = np.arange(tail.shape[1]) / SR
    early_lift = gain_of(EARLY_DB * np.exp(-((t - EARLY_S) / EARLY_WIDTH_S) ** 2))
    tail *= np.clip(t / 0.0046, 0, 1) ** 2 * early_lift

    size = next_fast_len(N, real=True)
    turn = -2j * np.pi * np.fft.rfftfreq(size, 1 / SR)
    # the phone's body colours the two sides in opposite ways
    scatter = gain_of(scatter_db) * np.exp(turn * .00025)
    sides = np.array([1 + scatter, (1 - scatter) * np.exp(turn * lead_s)])
    direct = irfft(rfft(x, size) * sides, size)[:, :N]

    # the tail is blurred in pitch, most of all in the treble, so it dies as an even rattle
    wander = np.cumsum(evened(uniform_filter1d(rng.standard_normal(N), size=40))) / SR
    body = lows(x, 2300)
    blurred = np.zeros(N)
    for part, blur_hz in [(body, BODY_BLUR_HZ), (x - body, TREBLE_BLUR_HZ)]:
        blurred += (signal.hilbert(part, size)[:N] * np.exp(2j * np.pi * blur_hz * wander)).real
    blurred = band(blurred, 140, 18000, order=2)
    return direct + signal.fftconvolve(blurred[None], tail, axes=1)[:, :N]


def scene():
    """Case, lid, table and tape sound in the room, over its background."""
    hands = squeaks() + fingers_on_case() + finger_knocks() + case_clicks() + lid_clicks()
    hands += tape_in_case() + case_drop() + case_sliding() + table_knocks() + case_settles()
    hands += tape_clicks() + fingers_on_tape()
    return room(hands) + background()


def record(dry):
    """The microphone lifts 12 kHz and dulls the top. Apart from that, peaks near 1 are softly rounded so they
    stay below 1, then the band ends."""
    size = next_fast_len(N, real=True)
    hz = np.fft.rfftfreq(size, 1 / SR)
    tone_db = read([(10000, -1.5), (12000, 6), (15000, -11.5)], hz)[0]  # pitch_hz, level_db
    coloured = irfft(rfft(dry, size) * gain_of(tone_db), size)[:, :N]
    rounded = np.tanh(coloured)
    band_limit = signal.firwin(511, EDGE_HZ, window=("kaiser", 9), fs=SR)
    return signal.oaconvolve(rounded, band_limit[None], "same")


dry = scene()
out = record(dry)
inscribe(out)
```